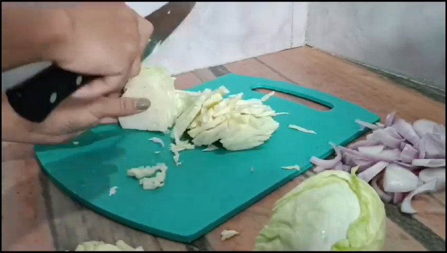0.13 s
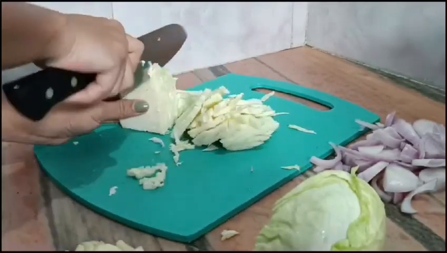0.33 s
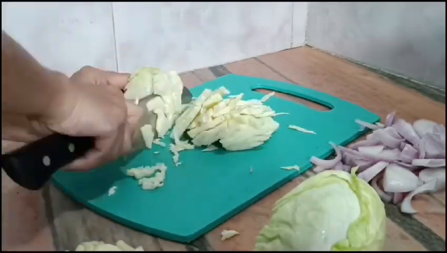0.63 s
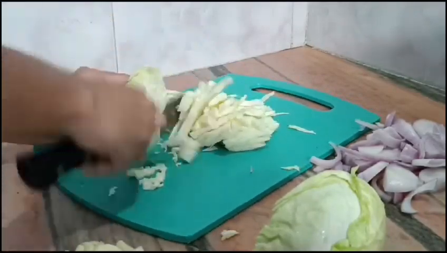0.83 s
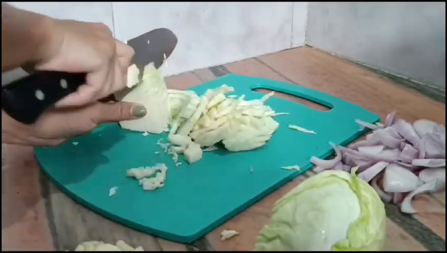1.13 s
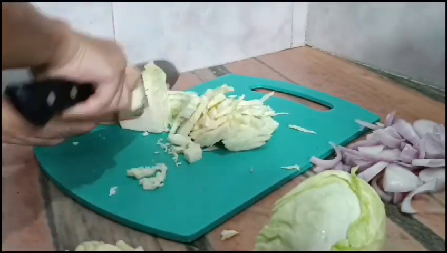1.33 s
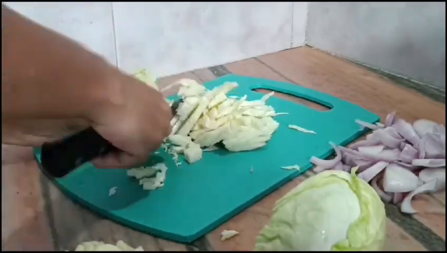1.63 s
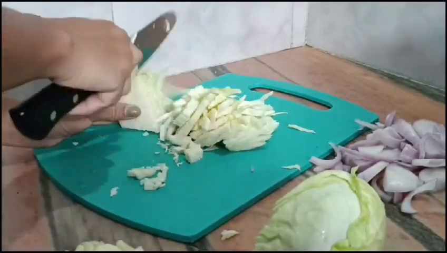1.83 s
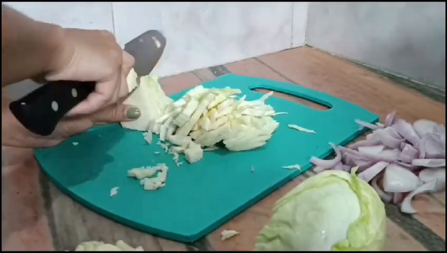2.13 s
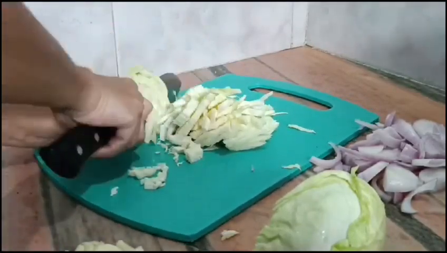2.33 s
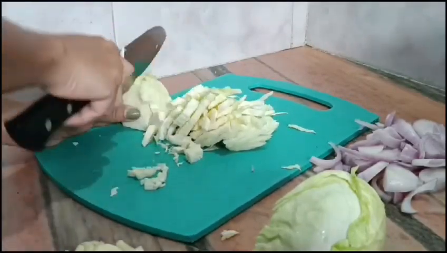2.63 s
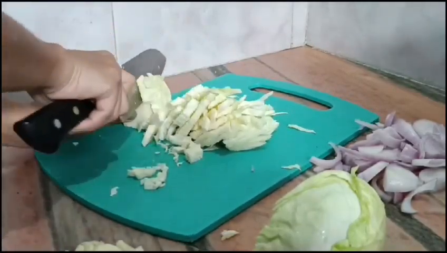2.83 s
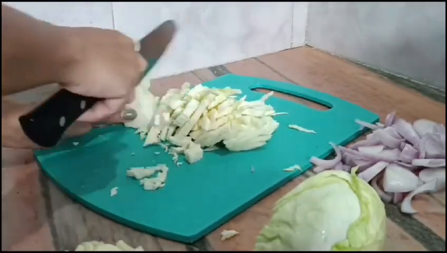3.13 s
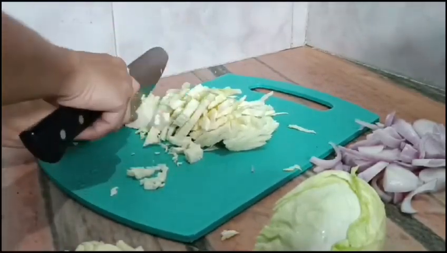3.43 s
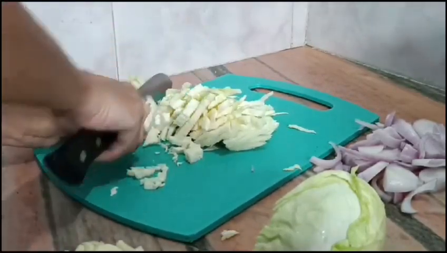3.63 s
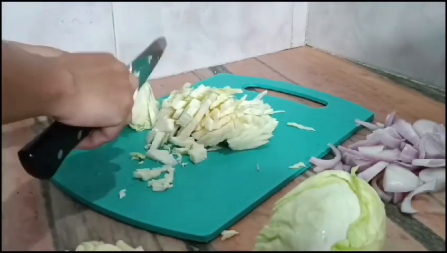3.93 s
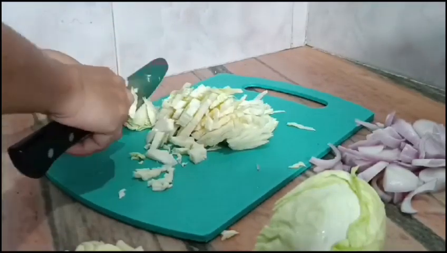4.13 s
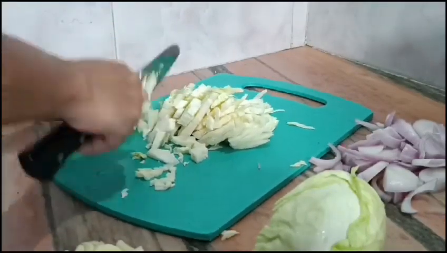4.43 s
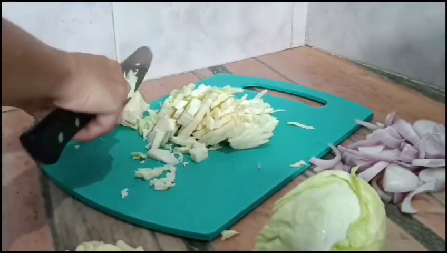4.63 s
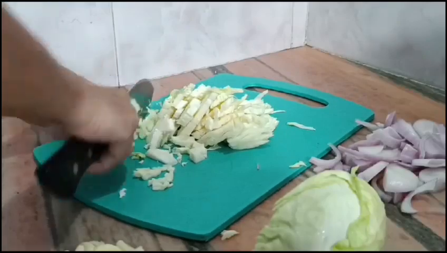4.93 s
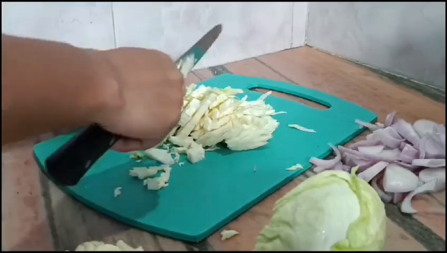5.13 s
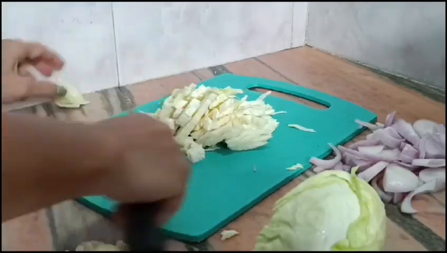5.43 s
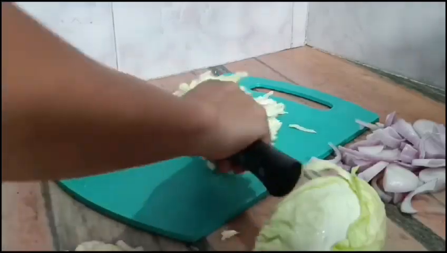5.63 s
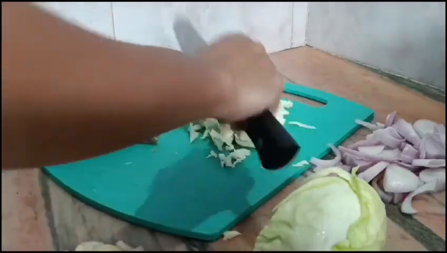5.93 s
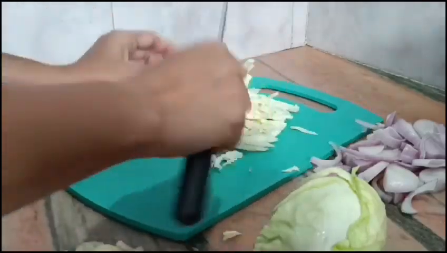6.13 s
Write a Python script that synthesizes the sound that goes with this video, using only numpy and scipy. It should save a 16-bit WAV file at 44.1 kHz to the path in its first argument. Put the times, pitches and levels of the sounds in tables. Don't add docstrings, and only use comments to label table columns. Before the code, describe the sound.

Close phone pickup in a small tiled kitchen, with short reflections, faint uneven low rumble and thin hiss. Soft crackle and a light tick open the scene; at 0.47 to 0.57 s a hard, clattering double chop strikes the plastic board, with a counter thump. Ticks lead to a loud, dry leafy crunch around 1.07 s. A duller knock comes at 1.57 s, followed by faint rustles and ticks. Strong hollow knocks with crisp bites land at 2.67 and 3.11 s, then a short crunch at 3.5 and a weak chop at 3.88 s. A clean hard knock hits at 4.25 s, a crackling tear at 4.65, a lighter bite at 4.98 and another firm knock at 5.31 s. Sound vanishes from 5.47 to 5.55 s, returns for a small crunchy chop at 5.66, then cuts to total silence at about 5.73 s until 6.3 s.

```python
import sys
import numpy as np
from scipy import signal
from scipy.fft import rfft, irfft, next_fast_len
from scipy.io import wavfile
from scipy.ndimage import uniform_filter1d, map_coordinates

SR = 44100
rng = np.random.default_rng(int(sys.argv[2]) if len(sys.argv) > 2 else 0)


def to_wav(s):
    ch = np.atleast_2d(s).T
    pcm = np.round(np.clip(ch, -1, 1) * 32767)
    wavfile.write(sys.argv[1], SR, pcm.astype(np.int16))


def elevation(decibels):
    levels = np.asarray(decibels, float)
    return 10 ** (levels / 20)


N = 276727


def unit(x):
    return x / np.sqrt(np.mean(x ** 2) + 1e-20)


def along(points, hz):
    f, v = np.transpose(points)
    return np.interp(np.log(hz + 1), np.log(f + 1), v)


def over_time(points):
    s, v = np.transpose(points)
    return np.interp(np.arange(N) / SR, s, v)


def wobble(rate):
    knots = rng.standard_normal(int(N * rate / SR) + 4)
    return map_coordinates(knots, [np.arange(N) * rate / SR])


def filtered(x, response):
    m = next_fast_len(N + SR // 2)
    return irfft(rfft(x, m) * response(np.fft.rfftfreq(m, 1 / SR)), m)[..., :N]


def coloured(x, curve):
    return filtered(x, lambda hz: elevation(along(curve, hz)))


def modes(table, hz):
    total = 0
    for k, (centre, width, db) in enumerate(table):
        ring = 1j * hz * width / (centre * centre - hz * hz + 1j * hz * width)
        total = total + (-1) ** k * elevation(db) * ring
    return total


# time_s, level_db
RUMBLE_LEVEL = [(0.0, -58.5), (0.48, -72), (0.6, -50), (0.65, -63), (2.42, -66.5), (2.71, -60),
                (4.13, -68.5), (4.27, -61.5), (4.94, -65), (5.07, -58.5), (5.27, -73.5), (5.4, -54),
                (5.46, -73), (5.72, -54.5)]
# freq_hz, density_db (per Hz)
RUMBLE_COLOUR = [(8, -59), (18, -14), (35, 2.5), (60, -10), (110, -14.5), (230, -21.5), (500, -35),
                 (1000, -63.5)]
# freq_hz, density_db (per Hz)
HISS_COLOUR = [(200, -11), (500, 1), (1500, -5), (4000, -12), (8000, -10), (15500, -10)]
HISS_DB = -79


def room_tone():
    rumble = unit(coloured(rng.standard_normal(N), RUMBLE_COLOUR))
    hiss = unit(coloured(rng.standard_normal(N), HISS_COLOUR))
    rumble_db = over_time(RUMBLE_LEVEL) - 5.0 + 2.5 * wobble(8)
    hiss_db = HISS_DB + 2.6 * wobble(42)
    return elevation(rumble_db) * rumble + elevation(hiss_db) * hiss


# freq_hz, gain_db
WALLS = [(60, -2.5), (300, -0.5), (1200, -3.5), (3000, -4), (6000, -5.5), (11000, -13.5)]
# freq_hz, t60_s
KITCHEN_DECAY = [(100, 0.43), (700, 0.26), (2000, 0.3), (5000, .22), (10000, 0.65)]


def kitchen(x):
    x = coloured(x, WALLS)
    wet = np.zeros(N + SR)
    step = SR // 3
    for start in range(0, N, step):
        hz, t, z = signal.stft(rng.standard_normal(SR // 2), SR, nperseg=256)
        decay = elevation(-60 * t / along(KITCHEN_DECAY, hz)[:, None])
        tail = signal.istft(z * decay, SR, nperseg=256)[1]
        echo = signal.fftconvolve(x[start:start + step], tail / np.linalg.norm(tail))
        wet[start + 130:][:len(echo)] += echo
    return wet[:N]


# freq_hz, width_hz, level_db
COUNTER_MODES = [(98.64, 17, 0.5), (187, 86, 0), (228, 43, 8), (427, 120, 1)]
# time_s, peak_db, push_ms
THUMPS = [(0.014, -52, 1.3), (0.128, -56, 1.3), (0.409, -38, 1.3), (0.473, -35, 1.3), (0.55, -24, 1.3),
          (0.564, -29.5, 1.3), (0.94, -53.5, 1.3), (0.972, -48.5, 1.3), (1.012, -56, 1.3), (1.05, -52, 1.3),
          (1.527, -52, 1.3), (1.565, -38.5, 1.3), (2.352, -59, 1.3), (2.549, -53.5, 1.3),
          (2.634, -62.5, 1.3), (2.669, -37.5, 1.3), (3.007, -43, 1.3), (3.014, -43.5, 1.3),
          (3.11, -37.5, 1.3), (3.135, -42.5, 1.3), (3.493, -44, 1.3), (3.878, -44.5, 1.3),
          (4.25, -36.5, 1.3), (4.534, -56, 1.3), (4.632, -49.5, 1.3), (4.976, -42.5, 1.3),
          (5.311, -38, 1.3), (5.66, -33.5, 1.3)]
THUMP_DB = 3


def counter_thumps():
    force = np.zeros(N + SR)
    t = np.arange(SR // 20) / SR
    for s, db, push_ms in THUMPS:
        squeeze = t / (max(push_ms, .4) / 1000)
        force[round(s * SR):][:len(t)] += elevation(db + THUMP_DB) * squeeze * np.exp(1 - squeeze)
    return filtered(force[:N], lambda hz: modes(COUNTER_MODES, hz))


# freq_hz, width_hz, level_db
BOARD_LOW = [(656, 68, -6.5), (840.5, 54, 0), (1160, 130, 3), (1716, 31, 1.5), (1518, 720, -4.5)]


def board_low(hz):
    return modes(BOARD_LOW, hz)


# freq_hz, width_hz, level_db
BOARD_HIGH = [(1694, 130, -10.5), (2044, 85, 1.5), (2465, 840, -1), (2632, 1400, -2), (3750, 1400, -6.5),
              (4320, 1900, -12)]


def board_high(hz):
    return modes(BOARD_HIGH, hz)


# start_s, crackle_db, board_share_db, hold_ms, fade_ms (per 20 dB)
BITES = [(0, -56, -11, 27, 101), (.415, -64.5, -12, 62, 18), (0.472, -45, -6, 3, 75),
         (.552, -29.5, -16.5, 6.1, 14.5), (.946, -59.5, -3.5, 25, 54), (1.219, -59, -8.5, 9.3, 78),
         (1.54, -48, -5.5, 28, 32), (2.341, -64.5, -6, 6.3, 58.5), (2.462, -63, -15, 16, 19),
         (2.638, -50.5, -6, 22, 40), (2.663, -36.5, 3.5, 12, 4), (3.011, -57, -6.5, 190, 28),
         (3.107, -32.5, -4, 4.7, 14), (3.125, -53.5, 4, 30, 111.5), (1.96, -61.5, -22.5, 93, 175),
         (3.477, -73.5, -0.5, 14.7, 13.5), (3.572, -63.5, -15.5, 54, 29), (3.864, -56, -2.5, 8.8, 22),
         (3.883, -43, -7, 23.8, 22), (4.632, -61, -3, 35, 29), (4.98, -55, -14, 39.6, 26.5),
         (5.31, -46, -4.5, 4, 26), (5.663, -51, -2.5, 14, 49)]
BITE_SWELL_MS = 4.9
# loudest_s, crackle_db, board_share_db, swell_ms (per 20 dB), fade_ms (per 20 dB)
DRAGS = [(.248, -72, -24, 21, 87.5), (.6, -59.5, -8.5, 20, 83.5), (.745, -67, -5.5, 47, 43),
         (1.07, -36, -6, 58, 26), (1.622, -60, -12, 72, 51), (1.721, -68.5, -4, 14, 39),
         (1.798, -74, -1, 41, 8), (3.496, -47, -7.5, 24, 43), (2.099, -76, 8.5, 160, 160),
         (2.559, -55, -8, 78, 101), (2.72, -61.5, -18, 21, 160), (2.859, -73.5, -13, 280, 46.5),
         (3.299, -65, -5.5, 52, 60.5), (3.74, -82.5, -11.5, 42, 50), (3.965, -60.5, -33.5, 20, 53),
         (4.085, -70.5, -9.5, 57.7, 30), (4.44, -79.5, 6.5, 53, 63.5), (4.678, -45.5, -5, 38.3, 57.5),
         (4.74, -55.5, -30, 38, 17), (4.818, -72.5, -5, 26, 42.5), (5.17, -73, -14, 41, 45),
         (5.42, -70.5, -3, 50, 50), (5.58, -98.5, -3, 26.7, 87.5)]
DRAG_HOLD_MS = 9.8


def strokes():
    bites = [(s, db, board, BITE_SWELL_MS, hold, fade) for s, db, board, hold, fade in BITES]
    drags = [(s, db, board, swell, DRAG_HOLD_MS, fade) for s, db, board, swell, fade in DRAGS]
    return bites + drags


def patchy(x, depth_db):
    z = signal.stft(x, nperseg=256)[2]
    field = uniform_filter1d(rng.standard_normal(z.shape), size=5, axis=0)
    field = uniform_filter1d(field, size=6, axis=1)
    return signal.istft(z * elevation(depth_db * unit(field)), nperseg=256)[1][:N]


def cell_bursts():
    pops = (rng.random(N) < 2500 / SR) * rng.standard_normal(N)
    pops = pops * elevation(0.64 * np.minimum(rng.exponential(size=N), 3))
    clumps = elevation(2.5 * np.tanh(wobble(110)) + 2.4 * wobble(400))
    grains = unit(clumps * (unit(pops) + 1.25 * rng.standard_normal(N)))
    return patchy(grains, depth_db=3.6)


# freq_hz, density_db (per Hz)
LEAF_COLOUR = [(150, -14), (1830, -12.5), (3500, -12.5), (4800, -19), (7410, -18), (10900, -25),
               (11500, -25.5), (15500, -31.5)]


def leaves():
    ms = np.arange(N) / SR * 1000
    crackle, jolt = np.zeros((2, N))
    for s, db, board_db, swell, hold, fade in strokes():
        near = slice(max(0, round((s - .3) * SR)), round((s + .6) * SR))
        late = ms[near] - 1000 * s
        before = np.maximum(-late / max(swell, 1), 0)
        after = np.maximum((late - hold) / max(fade, 1), 0)
        drop_db = 20 * (before + after)
        crackle[near] += elevation(db - drop_db)
        jolt[near] += elevation(db + board_db - drop_db)
    grains = cell_bursts()
    fizz = unit(filtered(grains, lambda hz: elevation(along(LEAF_COLOUR, hz)) / (1 + (2600 / (hz + 1)) ** 4)))
    body = unit(filtered(grains, lambda hz: board_low(hz) + 1.2 * board_high(hz)))
    return elevation(2.0) * crackle * fizz + elevation(4.5) * jolt * body


# time_s, peak_db, crack_db, upper_mode_db, contact_ms
CHOPS = [(.474, -24.5, -19.5, -12, 4.3), (.553, -2, -15, -25, 0.35), (.564, -8, -27.5, -8, 3),
         (.568, 0.5, -21.5, -12.5, 1.5), (.585, -23.5, -33.5, 2, 1.1), (1.077, -22, -4, -5, 1.4),
         (1.567, -11, -54, -16.5, 3.97), (2.668, -4.5, -23.5, -10, 2.3), (3.111, 1, -32, 1.5, 1.3),
         (3.127, -16, -27.5, -3.5, 0.51), (3.135, -17.5, -27, 3, 1.38), (3.876, -26, -15, -7.5, .92),
         (4.251, 1, -40, -18.5, 0.83), (4.2528, -4, -31.5, -13.5, 2), (4.665, -22.5, -10, -6.5, 1.5),
         (4.977, -29, -15, -10, 2.1), (5.3133, -2.5, -34.5, -13, 0.86), (5.316, -14.5, -26, -9.5, 2.9),
         (5.663, -33.5, -16, -7.5, 2.4), (5.669, -24, -24, -35, 1)]
# time_s, peak_db, crack_db, upper_mode_db
TICKS = [(0.015, -57.5, 9, -14), (.131, -40.5, -17, -20), (.409, -39, -4, -16), (.525, -36, -3.5, -9),
         (0.942, -40.5, -5, -18), (.974, -33, -5.5, -15), (1.012, -35, -8, -17), (1.218, -42.5, 6, 1),
         (1.225, -38, -6, -2.5), (1.528, -52.5, 1, -11), (1.897, -45.5, -11, -13), (2.335, -49, -13, -11),
         (2.355, -53, 0, -21.5), (2.551, -38.5, -3, -10), (2.636, -49.5, 7, -0.5), (3.006, -45.5, 4, -22),
         (3.015, -51.5, -10.5, -16.5), (3.103, -33.5, -7.5, -3), (3.491, -47, -21, 5),
         (3.698, -54, -4.5, -17.5), (3.722, -53.5, -5, -7), (3.899, -37.5, -20, -12),
         (4.027, -54, -7.5, -11.5), (4.602, -61.5, -2.5, -17), (4.628, -40, -2, -13),
         (4.697, -41, -22, 4.5), (4.839, -52, -9.5, -9.5), (5.137, -54, -5, -10.5)]
TICK_MS = 1.4


def contacts():
    return CHOPS + [(*tick, TICK_MS) for tick in TICKS]


# freq_hz, gain_db
SCATTER_LOW = [(100, -29), (230, -13.5), (400, -20), (700, -13.5), (1150, 3), (2050, -5), (2600, -18.5),
               (5000, -26)]
# freq_hz, gain_db
SCATTER_HIGH = [(800, -33.5), (1400, -15), (2000, -5), (2800, 1.5), (3700, 4), (4500, -7), (6000, -16),
                (11000, -29)]


def knife_knocks():
    low, high, crack, far_low, far_high = np.zeros((5, N + SR))
    t = np.arange(SR // 40) / SR
    blow = t / .0001 * np.exp(1 - t / .0001)
    grip = 1 - np.exp(-t / .0009)
    for s, db, crack_db, upper_db, contact_ms in contacts():
        first = round((s + .0005) * SR)
        at = slice(first, first + len(t))
        fade = np.exp(-t / (max(contact_ms, .2) / 1000)) * grip
        chatter = rng.standard_normal(len(t)) * fade
        force = -1.5 * blow + 1.5 * chatter
        low[at] += elevation(db - 3.0) * force
        high[at] += elevation(db + upper_db + 15.0) * force
        crack[at] += elevation(db + crack_db + 8.5) * chatter
        far_low[at] += elevation(db - 2.0) * blow
        far_high[at] += elevation(db + upper_db + 3.5) * blow
    bright = signal.sosfilt(signal.butter(2, [3000, 11000], "band", fs=SR, output="sos"), crack[:N])
    board = filtered(low[:N], board_low) + filtered(high[:N], board_high)
    board = signal.sosfilt(signal.butter(2, 5000, fs=SR, output="sos"), board)
    thud = counter_thumps()
    spread = coloured(far_low[:N], SCATTER_LOW) + coloured(far_high[:N], SCATTER_HIGH)
    to_room = spread + elevation(-12.5) * board + elevation(-2.0) * bright + elevation(-7) * thud
    return board + thud + bright, to_room


def scene():
    hits, to_room = knife_knocks()
    shreds = leaves()
    echoes = kitchen(to_room + elevation(-8.5) * shreds)
    return (hits + shreds + echoes + room_tone())[None]


STARVE_DELAY_S, STARVE_S, STARVE_S_PER_DB = .012, .22, .004
STARVE_HZ, STARVE_HZ_PER_DB = 6800, -110
DRAG_STARVE_DB, DRAG_STARVE_HZ = (-78, -48), 8800
FULL_BLOW_DB = -13
# start_s, end_s
SPARED = [
    (.93, 1.095),
    (3.46, 3.58),
    (4.6, 4.78),
    (4.97, 5.06),
    (5.65, 5.74),
]


def treble_edge(t):
    spans = []
    for s, db, *_ in contacts():
        end = s + STARVE_S + STARVE_S_PER_DB * db
        spans.append((s + STARVE_DELAY_S, end, STARVE_HZ + STARVE_HZ_PER_DB * db))
    for s, db, _, swell, fade in DRAGS:
        if DRAG_STARVE_DB[0] < db < DRAG_STARVE_DB[1]:
            spans.append((s - swell / 1600, s + fade / 1000, DRAG_STARVE_HZ))
    edge = np.full(len(t), np.inf)
    for start, end, edge_hz in spans:
        inside = (t > start) & (t < end)
        edge[inside] = np.minimum(edge[inside], edge_hz)
    blows = [(s - STARVE_DELAY_S, s + STARVE_DELAY_S) for s, db, *_ in CHOPS if db > FULL_BLOW_DB]
    for start, end in SPARED + blows:
        edge[(t > start) & (t < end)] = np.inf
    return edge


def treble_dropouts(x):
    hz, t, z = signal.stft(x, SR, nperseg=512)
    luck = rng.logistic(size=(len(hz) // 5 + 1, len(t) // 4 + 1))
    luck = luck.repeat(5, axis=0).repeat(4, axis=1)[:len(hz), :len(t)]
    band_hz = np.minimum(hz[:, None] // 430 * 430, 10300)
    gone = (hz[:, None] > 4500) & (band_hz - treble_edge(t) > 1200 * luck)
    return signal.istft(z * np.where(gone, elevation(-30.0), 1), SR, nperseg=512)[1][..., :N]


def band_limit(x):
    return signal.sosfilt(signal.butter(12, 15880, fs=SR, output="sos"), x)


# freq_hz, gain_db
MIC = [(20, 7.5), (10800, -1), (11300, -16.5), (15000, -17), (16000, -38.5)]
# time_s, gain_db
MUTES = [
    (0, -0.5),
    (5.457, 0),
    (5.47, -88),
    (5.552, -94),
    (5.563, -2.5),
    (5.722, 2.5),
    (5.735, -100),
    (6.3, -100),
]
CEILING = .6


def record(dry):
    held = dry / (1 + abs(dry / CEILING) ** 4) ** (1 / 4)
    heard = treble_dropouts(coloured(held, MIC))
    mix = heard * elevation(over_time(MUTES))
    return band_limit(mix)


dry = scene()
out = record(dry)
to_wav(out)
```